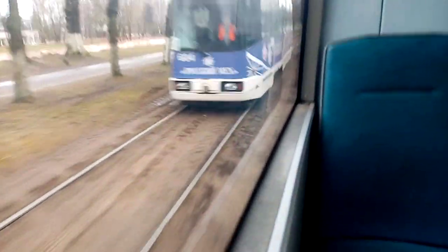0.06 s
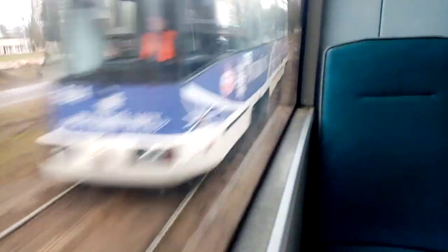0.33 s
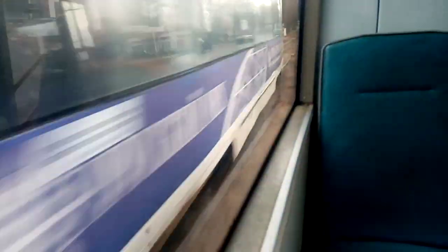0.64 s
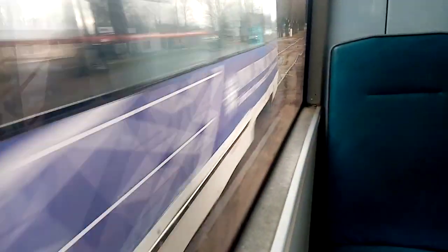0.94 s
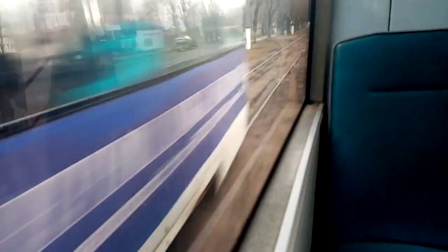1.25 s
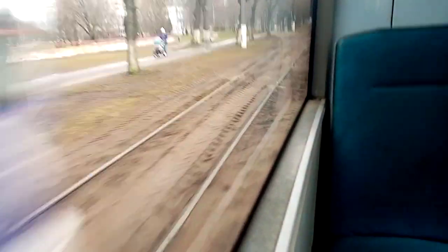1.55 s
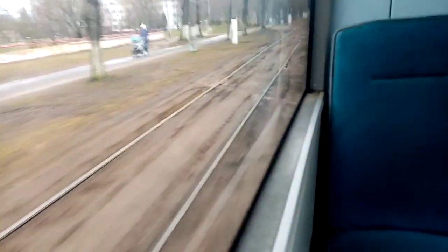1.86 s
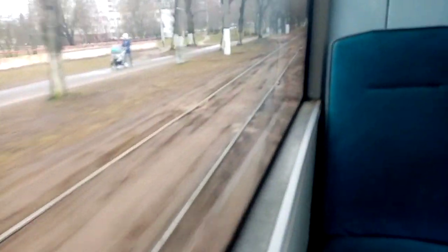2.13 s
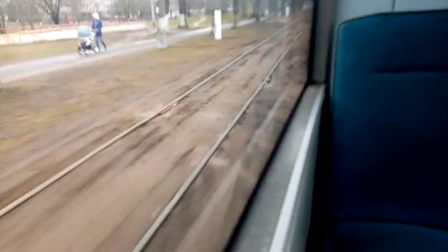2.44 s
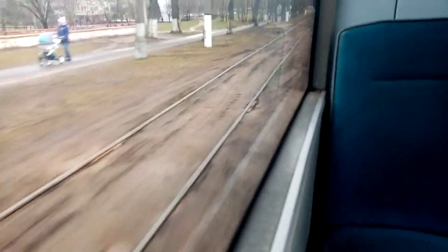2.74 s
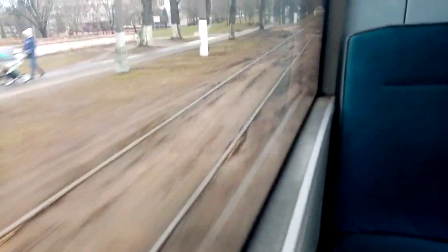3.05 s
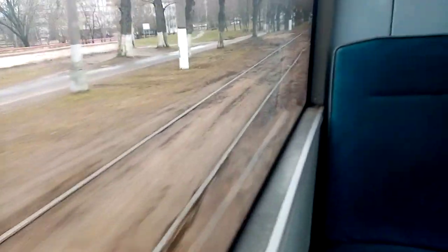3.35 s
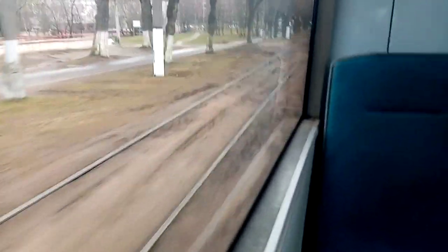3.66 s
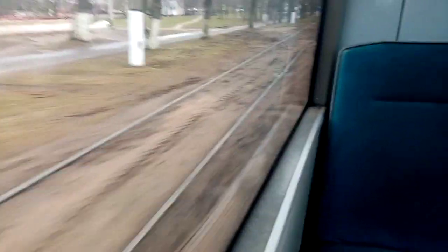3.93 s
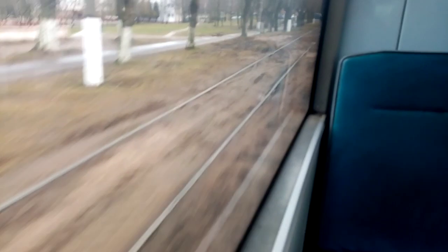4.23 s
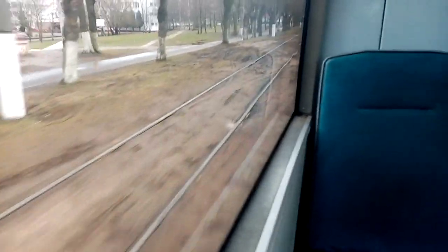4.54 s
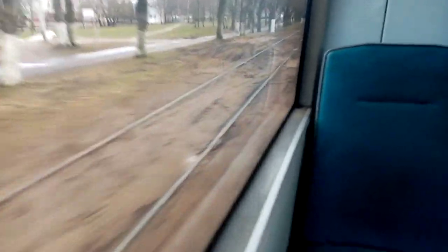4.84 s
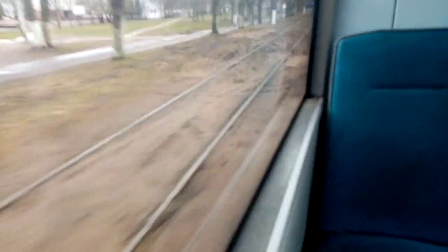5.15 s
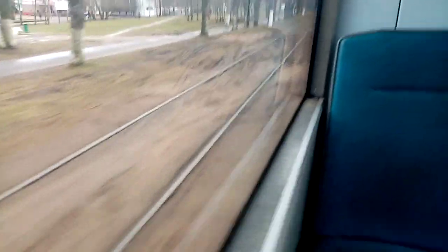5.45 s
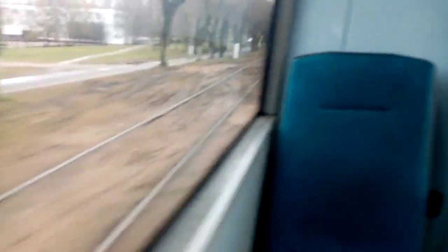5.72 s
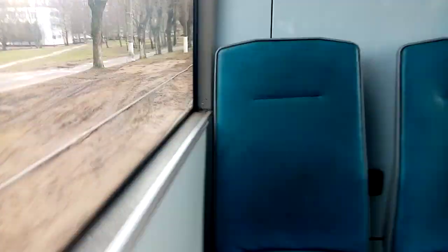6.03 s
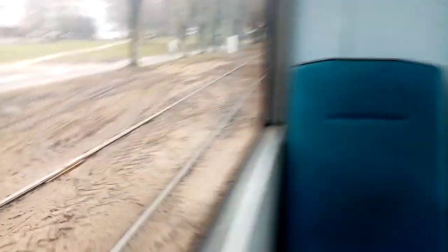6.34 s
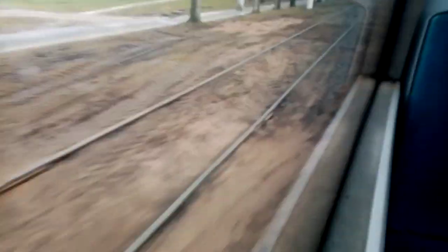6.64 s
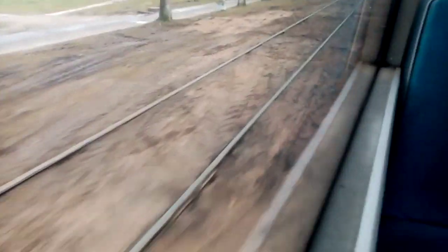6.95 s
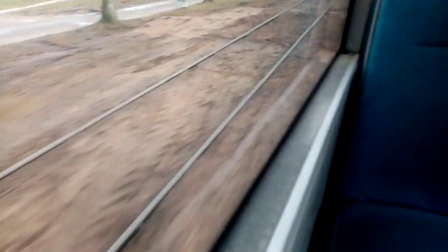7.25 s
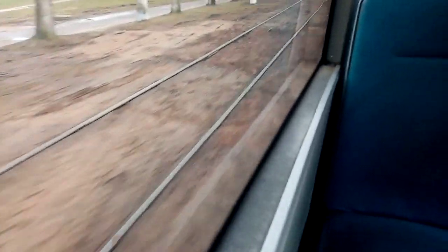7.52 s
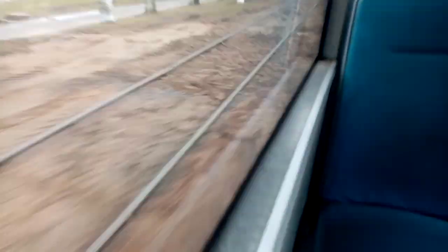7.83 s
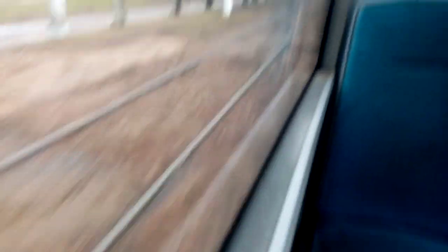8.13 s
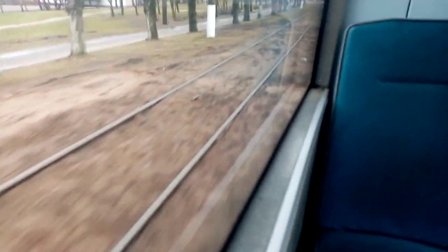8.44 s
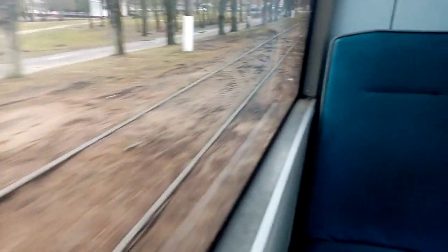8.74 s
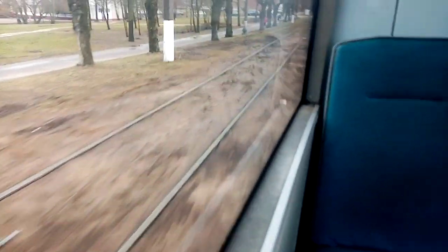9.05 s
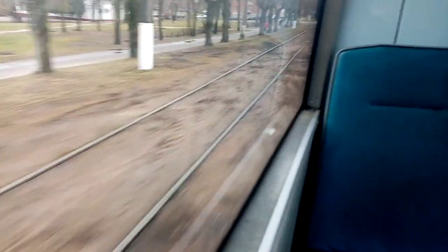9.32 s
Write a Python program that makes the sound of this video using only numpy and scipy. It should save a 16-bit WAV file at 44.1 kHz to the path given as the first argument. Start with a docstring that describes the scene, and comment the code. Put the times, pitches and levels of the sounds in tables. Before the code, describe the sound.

A tram runs at speed for about nine and a half seconds, heard from a window seat and louder on the left. A deep boom and drone continue throughout under the roar of steel wheels, surging slightly and swelling into brief low moans. Loose plates and fittings rattle lightly. The wheels thud and clank unevenly over joints near 0.2 seconds, from 1 to 2, around 3.5 to 4, and with a firmer thud at 4.3. The busiest stretch comes from 6.4 to 7.5, with clustered knocks and one dull wall panel bump at 6.6. Faint hoarse scrapes surface around 2 and 6.7 seconds. Dry trim clicks stand out near 2, 4.3, 5.2 and 7.4. Close by, something like a sleeve rustles softly in repeated strokes, easing after 8 seconds. A barely audible high electronic whine stays on the right.

```python
"""A tram's body booms and drones at speed, heard from a window seat, the left microphone toward the window.
The wheels drive it: they roar on the rails, make it moan on rippled track, knock over joints and scrape.
Steel plates and loose fittings rattle, trim clicks, and the wall panel takes one bump.
Close by, something soft like a sleeve rustles as its fibres catch and slip.
A limiter holds down the peaks, and a faint electronic whine sits on the right."""
import sys
import numpy as np
from scipy import signal
from scipy.fft import rfft, irfft, next_fast_len
from scipy.io import wavfile
from scipy.ndimage import uniform_filter1d, minimum_filter1d

SR = 44100
rng = np.random.default_rng(int(sys.argv[2]) if len(sys.argv) > 2 else 0)


def output_pcm(signal):
    """Save a mono or channel-first signal as 16-bit PCM at the path in sys.argv[1].

    Samples are clipped to [-1, 1] before scaling.
    """
    pcm = np.clip(np.atleast_2d(signal).T, -1, 1) * 32767
    wavfile.write(sys.argv[1], SR, np.round(pcm).astype(np.int16))


N = 418180
TIME = np.arange(N) / SR
MIC_LAG_S = 0.00095   # direct sound reaches the right microphone this much later

# Tone of the floor's boom, the walls' drone and the cabin's upper hum.
# Each row: frequency in Hz, relative level in dB.
BOOM_TONE = [(12, -59), (28, -45), (40, -23.5), (55, -11), (70, 2), (84, 2), (102, -1.5), (122, -11),
             (150, -18.5), (220, -92)]
DRONE_TONE = [(100, -20.5), (126, -10), (146, -2), (163, -1.5), (180, -3.5), (205, -10.5), (260, -31.5),
              (400, -83)]
HUM_TONE = [(140, -36.5), (195, 0), (225, -0.5), (270, -3.5), (298, -7), (320, -3.5), (350, -18.5),
            (430, -18.5), (600, -20), (1200, -82.5)]
# Slow fader rides for the same three. Each row: time in seconds, fader in dB.
BOOM_RIDE = [(0, -22), (2.2, -21), (3.7, -22.5), (4.7, -21.5), (5.5, -23.5), (6.25, -20), (6.5, -26.5),
             (7.3, -22.5), (8.2, -21.5), (9.48, -22.5)]
DRONE_RIDE = [(0, -20), (.5, -23.5), (.7, -23), (2.1, -22.5), (2.25, -28.5), (2.7, -22.5), (3.9, -22),
              (5.2, -21.5), (5.6, -21), (5.94, -27), (6.3, -23), (7.1, -23.5), (8.8, -20.5), (9.02, -28),
              (9.15, -21), (9.48, -24)]
HUM_RIDE = [(0, -25), (.33, -21.5), (.6, -31.5), (1.15, -23.5), (1.55, -30), (1.9, -26.5), (2.8, -27.5),
            (3.3, -25.5), (3.95, -26), (4.4, -27.5), (5.25, -28), (5.5, -23.5), (5.95, -30.5), (6.7, -26),
            (7.6, -25.5), (8.4, -27), (9.1, -27), (9.48, -27.5)]
# Dips in the track push or ease the boom. Each row: peak time in seconds, boost or cut in dB.
TRACK_DIPS = [(.48, 3), (.76, -3), (.9, 7), (1.06, -2), (1.24, 4), (2.07, -6), (2.24, 1), (3.06, -6),
              (3.2, 7.5), (3.45, 6), (3.72, 4.5), (3.86, 3.5), (4.03, 6), (4.722, -10), (5.42, -6),
              (7.37, -11), (7.5, 6), (7.67, -1), (7.77, 6), (7.98, 3.5), (8.4, -13), (8.54, 4.5), (9.25, 6)]


def car_body():
    """Floor and walls resonate; their long waves are alike at both microphones."""
    (boom_db,), (drone_db,), (hum_db,) = in_time(BOOM_RIDE), in_time(DRONE_RIDE), in_time(HUM_RIDE)
    lurch_db = sum(db * swell(s, half_s=0.063) for s, db in TRACK_DIPS)
    boom = sustained(cabin_noise(BOOM_TONE, diffuse=0.0094), window_s=0.16)
    hum = sustained(cabin_noise(HUM_TONE, diffuse=0.023), window_s=0.15)
    drone = sustained(cabin_noise(DRONE_TONE, diffuse=0.034), window_s=0.15)
    return from_db(boom_db + lurch_db) * boom + from_db(drone_db + 0.4) * drone + from_db(hum_db) * hum


# Moans of the body. Each row: peak time in seconds, half length in seconds, pitch in Hz,
# glide in Hz per second, level in dB.
BODY_MOANS = [(0.696, 0.16, 158.1, -21, -22), (0.884, 0.12, 80, 4.5, -21), (1.573, 0.18, 158.3, 0.5, -21.5),
              (2.13, 0.05, 313, -2, -29), (2.399, 0.45, 82, -5, -23), (2.657, 0.14, 168, 0.5, -23),
              (3.17, 0.086, 143.7, -1, -24), (3.59, 0.14, 161, -0.5, -21.5), (3.94, 0.065, 226, 2.5, -17.5),
              (4.687, 0.063, 160, -1, -16.5), (5.485, 0.19, 230, -34.5, -16.5),
              (5.85, 0.23, 72.4, -2.5, -26.5), (6.367, 0.11, 147, -44, -17.5), (6.712, 0.022, 420, 0, -23),
              (6.925, 0.071, 418, -0.5, -25), (7.152, 0.071, 240, 0, -26), (7.34, 0.21, 147, 46, -20),
              (7.675, 0.12, 152.4, 5.5, -18.5), (9.117, 0.13, 232.6, -0.5, -22.5),
              (9.234, 0.21, 84, -0.5, -20)]


def moans():
    """Short rough, wavering tones swell and fade as the wheels cross rippled rail."""
    out, waver_hz = np.zeros((2, N)), 2.85 * drift(9.7)
    for s, half_s, hz, glide, db in BODY_MOANS:
        pitch = hz + glide * np.clip(TIME - s, -half_s, half_s) + waver_hz
        cycles = np.cumsum(pitch) / SR - hz * np.array([[0], [MIC_LAG_S]])
        tone = np.sqrt(2) * np.sin(2 * np.pi * cycles)
        out += from_db(db) * swell(s, half_s) * window_pan(hz) * tone
    return out * from_db(2.3 * drift(17))


# Rough stretches of rail. Each row: start in seconds, release in seconds, gain change in dB.
ROUGH_STRETCHES = [(0.13, 0.29, 2), (0.937, 0.25, 4), (1.16, .4, 2), (1.634, 0.47, 1.5), (2.082, 0.27, 1.5),
                   (2.703, 0.13, 2), (3.15, 0.22, 0.5), (3.467, 0.36, -0.5), (3.872, 0.055, 3),
                   (5.67, 0.057, 4), (6.38, 0.43, 1.5), (6.686, 0.22, 0), (6.95, 0.24, 3.5),
                   (7.398, 0.12, 3), (7.8, 0.14, 2.5), (8.047, 0.076, 1.5), (9.36, 0.11, 5)]


def rough_rail(attack_s=0.029):
    """Boost in dB from rough rail: a quick attack on each stretch, then an even fall."""
    boost_db = np.zeros(N)
    for s, release_s, db in ROUGH_STRETCHES:
        rise, fall = (TIME - s) / attack_s, 1 - (TIME - s - attack_s) / release_s
        boost_db += db * np.clip(np.minimum(rise, fall), 0, 1)
    return boost_db


# Tone of the rolling roar and of the ringing steel. Each row: frequency in Hz, relative level in dB.
ROAR_TONE = [(200, -31), (330, 5), (430, 2), (520, 1), (630, -2.5), (830, -2), (1020, -3.5), (1200, -6.5),
             (1600, -13), (3000, -74)]
STEEL_TONE = [(900, -20.5), (1350, -2), (1650, 3), (1950, 0.5), (2200, -1), (2450, -0.5), (2750, -3.5),
              (3300, -8.5), (4200, -11.5), (6000, -15.5), (9000, -65)]
# Wheels on even rail, ahead of the trims. Each row: time in seconds, roar fader in dB, steel fader in dB.
ROLLING_RIDE = [(0.0, -31, -37), (1.24, -30, -35.5), (1.4, -31.5, -34), (2.9, -29, -35.5),
                (3.62, -28.5, -34), (4.09, -30, -37), (4.62, -28.5, -34), (5.65, -30.5, -35),
                (5.91, -30.5, -32), (6.47, -28.5, -34.5), (9.29, -30.5, -38.5), (9.48, -31.5, -39)]


def wheels(roar_trim_db=-1, steel_trim_db=-1.54):
    """Rolling roar and the ring of the steel, both fluttering with the roughness of the rail."""
    roar_db, steel_db = in_time(ROLLING_RIDE)
    boost_db, flutter = rough_rail(), drift(15.6)
    roar_gain = from_db(roar_db + roar_trim_db + boost_db + 0.87 * flutter)
    steel_gain = from_db(steel_db + steel_trim_db + 0.96 * boost_db + 0.7 * flutter)
    roar = roar_gain * cabin_noise(ROAR_TONE, diffuse=0.66, lag_s=0.001)
    steel = steel_gain * cabin_noise(STEEL_TONE, diffuse=0.9, lag_s=0.001384)
    return roar + steel


# Knocks of wheels and steel. Each row: start in seconds, thud fader in dB, clank fader in dB, clank attack in
# seconds.
JOINT_HITS = [(0.156, -42.5, -20.5, 0.00035), (0.172, -34, -31, 0.0022), (0.238, -27, -26.5, 0.00093),
              (0.96, -35, -24, .005), (1.02, -36, -28, .005), (1.141, -28, -32, .005),
              (1.23, -32, -26.5, 0.0025), (1.638, -44, -24.5, 0.0021), (1.84, -36, -27, 0.0016),
              (1.975, -28, -27.5, 0.0033), (2.109, -20, -46, 0.0022), (2.712, -39, -29, 0.0028),
              (3.409, -42, -31, 0.0022), (3.504, -30, -26.5, 0.0016), (3.612, -40, -25.5, .002),
              (3.893, -28, -25, 0.00069), (4.257, -18.5, -30, 0.0024), (4.671, -40, -27, 0.0014),
              (4.765, -40, -27.5, 0.0013), (4.846, -42, -27, .001), (5.18, -36, -31, 0.003),
              (5.882, -45, -27.5, 0.0009), (6.395, -21.5, -36, .002), (6.485, -27, -29, 0.0032),
              (6.697, -22, -23, .008), (6.968, -25, -20.5, .0008), (6.994, -30, -27, 0.0012),
              (7.028, -25, -26.5, 0.002), (7.068, -27, -42, 0.0018), (7.135, -25.5, -24.5, .005),
              (7.251, -40, -29, .004), (7.436, -31, -26, .002), (7.551, -44, -28.5, 0.0023),
              (8.09, -26, -39, 0.0023), (8.612, -40, -31, .002), (9.379, -33, -32, 0.0022)]
# Tone of the thud. Each row: frequency in Hz, relative level in dB.
THUD_TONE = [(120, -18), (240, -12), (340, 16), (500, -2), (900, -10), (2000, -45)]
# Resonances of the bogie. Each row: centre in Hz, bandwidth in Hz, relative level in dB.
BOGIE_MODES = [(480, 270, -17), (776, 150, 1), (940, 390, 9.5), (1355, 200, 6), (1730, 130, 5),
               (1900, 560, -1), (2570, 1900, -4.5), (3150, 380, -12)]


def knocks():
    """Each knock sends a dull thud through the floor, clanks the bogie and sets the plates chattering."""
    times, thud_db, clank_db, attack_s = np.transpose(JOINT_HITS)
    thud = hit_envelope(times, thud_db, t60=0.14, attack_s=0.0024) * cabin_noise(THUD_TONE, diffuse=0.24)
    clank_gain = hit_envelope(times, clank_db - 4, t60=0.25, attack_s=attack_s)
    clank = clank_gain * cabin_noise(through_floor(BOGIE_MODES), diffuse=1, lag_s=0.00088)
    return thud + clank + chatter(times + attack_s, clank_db - 5)


def chatter(times, dbs, count=4, gap_s=0.016, loss_db=10.5):
    """After a knock the plates strike in an uneven run, weaker each time."""
    gaps = gap_s * (.5 + rng.random((len(times), count)))
    contact_s = times[:, None] + np.cumsum(gaps, axis=1) - gaps[:, :1]
    contact_db = dbs[:, None] - loss_db * np.arange(count)
    return plate_ring(contact_s.ravel(), contact_db.ravel())


# Modes of the car's steel plates. Each row: pitch in Hz, relative level in dB, 60 dB decay in seconds.
PLATE_MODES = [(555, -1.5, 0.15), (747, -6.5, 0.086), (916, 1, 0.14), (989, 1, 0.19), (1090, -4.5, 0.13),
               (1320, -12, 0.074), (1622, 0, 0.13), (1797, -2.5, .16), (1916, -5.5, 0.086),
               (2484, -6.5, .18), (2800, -13, 0.17), (2920, -12, 0.15)]


def plate_ring(times, dbs, spread_db=3):
    """Each contact rings the plates' modes, every one with a random strength of its own."""
    starts, out = np.clip(times * SR, 0, N - 1).astype(int), np.zeros((2, N))
    draws = rng.standard_normal((len(starts), 2, len(PLATE_MODES), 2))
    strengths = np.sign(draws[:, 0]) * from_db(spread_db * (draws[:, 1] - .5))
    for k, (hz, db, t60) in enumerate(PLATE_MODES):
        blows = np.full((2, N), 1e-18)
        blows[:, starts] = from_db(dbs + db) * strengths[:, k].T
        r, w = from_db(-60 / (t60 * SR)), 2 * np.pi * hz / SR
        out += window_pan(hz) * signal.lfilter([0, np.sin(w)], [1, -2 * r * np.cos(w), r * r], blows)
    return out


# Hoarse scrapes of steel on steel. Each row: peak time in seconds, half length in seconds,
# centre in Hz, bandwidth in Hz, level in dB before the floor muffles it.
STEEL_SCRAPES = [(0.754, .06, 7400, 600, -39), (1.662, 0.074, 830, 110, -27.5),
                 (1.68, 0.16, 3110, 150, -33.5), (1.86, 0.058, 3000, 400, -34),
                 (1.26, 0.11, 2380, 900, -34), (2.24, 0.24, 2480, 500, -31.5),
                 (2.755, 0.18, 2800, 400, -36), (3.247, 0.29, 2760, 350, -39), (4.36, .12, 2430, 120, -37),
                 (4.683, .15, 2380, 400, -38.5), (6.61, 0.12, 1700, 1100, -28),
                 (6.707, 0.031, 2100, 700, -32), (6.82, 0.066, 2200, 1200, -32.5),
                 (7.186, 0.065, 2500, 110, -33.5), (7.4, .06, 2470, 80, -42), (8.1, .05, 1000, 250, -30),
                 (8.27, .05, 2600, 300, -38), (8.45, 0.1, 2580, 300, -35), (8.66, .07, 4500, 120, -46),
                 (8.972, .06, 4560, 120, -47), (9.28, .06, 4570, 150, -46)]


def scrapes(floor_cutoff_hz=7500):
    """Friction excites one resonance of the steel, too unevenly to become a clean squeal."""
    out, white = np.zeros((2, N)), rng.standard_normal((2, N))
    for s, half_s, hz, width, db in STEEL_SCRAPES:
        r = np.exp(-np.pi * width / SR)
        ringing = signal.lfilter([1, 0, -1], [1, -2 * r * np.cos(2 * np.pi * hz / SR), r * r], white)
        out += from_db(db) * swell(s, half_s) * window_pan(hz) * rms_one(ringing)
    return butter(out, 4, floor_cutoff_hz)


# Modes of the wall panel by the seat. Each row: pitch in Hz, relative level in dB, 60 dB decay in seconds.
PANEL_MODES = [(315, -1.5, 0.08), (407, -3, 0.054), (603, -7, .035), (1090, -0.5, 0.012), (1630, -10, .012)]


def panel_bump(start_s=6.6487, gain_db=-4.5):
    """A single soft blow sets the well-damped panel ringing."""
    age = np.maximum(TIME - start_s - np.array([[0], [MIC_LAG_S]]), 0)
    ring = sum(from_db(np.maximum(db - 60 * age / t60, -200)) * np.sin(2 * np.pi * hz * age)
               for hz, db, t60 in PANEL_MODES)
    return -from_db(gain_db) * pan(16) * butter(ring, 2, 3500)


# Tone of the cloth's rustle and of its crisp top. Each row: frequency in Hz, relative level in dB.
RUSTLE_TONE = [(1500, -12.5), (3000, -3.5), (4200, -3), (5400, -3), (6200, 1), (6750, 3.5), (7300, -0.5),
               (7900, -9), (8400, -28.5), (10500, -39)]
CRISP_TONE = [(6000, -13), (8500, 2.5), (11000, -2), (13000, -4.5), (14000, -8), (14700, 8), (15400, 0),
              (17000, -28)]
# Light steady rubbing, ahead of the trims. Each row: time in seconds, rustle fader in dB, top fader in dB.
CLOTH_RIDE = [(0, -44.5, -80), (1.0, -40.5, -77), (1.93, -39, -72), (2.2, -35.5, -66), (2.55, -39.5, -67),
              (2.66, -45.5, -76), (2.76, -41, -70), (3.0, -44, -74), (3.25, -41, -75), (3.47, -45, -77),
              (3.6, -41, -60), (4.02, -41.5, -62), (4.48, -41, -66), (4.7, -38.5, -66), (5.06, -39, -67),
              (5.4, -36, -65), (5.55, -39, -67), (6.1, -38.5, -64), (6.68, -38.5, -68), (7.6, -41.5, -65),
              (8.15, -45, -78), (8.6, -44, -78), (9.0, -44, -74), (9.48, -43, -71)]
# Strokes of the cloth. Each row: peak time in seconds, half length in seconds, level in dB,
# crisp top in dB relative to that, left over right in dB.
CLOTH_STROKES = [(0.32, 0.44, -38, -24.5, 1), (0.742, 0.076, -39, -30, -1), (1.224, 0.06, -35.5, -24, -1),
                 (1.48, 0.13, -38.5, -27, -1), (1.674, 0.071, -35.5, -41, -1),
                 (1.788, 0.055, -33.5, -21, 1), (1.99, 0.062, -32, -22, 4), (2.21, 0.097, -38, -28, 2),
                 (2.323, 0.065, -34, -25, 1), (2.525, 0.061, -37.5, -19, .5), (3.58, 0.15, -38, -14, -1),
                 (3.77, 0.25, -35.5, -16, -.5), (4.119, 0.058, -36.5, -16, -2), (4.34, 0.16, -36.5, -17, 0),
                 (4.565, 0.076, -38, -23, 0), (4.792, .045, -36.5, -21, 0), (4.905, 0.15, -35.5, -20, 1),
                 (5.22, 0.15, -35, -41, 2), (5.226, .035, -32, -36, 3), (5.755, 0.36, -40, -15, -7),
                 (5.954, 0.24, -32.5, -15, -3), (6.33, 0.097, -36, -15.5, -2), (6.55, 0.2, -36.5, -15.5, 0),
                 (6.622, 0.05, -36, -22, 2), (6.82, 0.055, -42, -26, 2), (6.998, 0.18, -38, -17, -2),
                 (7.126, 0.028, -38, -15, -3), (7.417, 0.069, -33, -17, -7), (7.574, 0.057, -40, -16, -11),
                 (7.655, 0.054, -39, -13, -6), (7.866, 0.045, -45, -11, -10), (8.332, 0.11, -48, -16, -1),
                 (9.414, .08, -43, -26, -3)]


def sleeve(rustle_trim_db=-0.5, crisp_trim_db=5):
    """Cloth rubs close by, strokes over light contact; its crisp top sits mostly on the right."""
    rustle_db, crisp_db = in_time(CLOTH_RIDE)
    rustle_power = (from_db(rustle_db + rustle_trim_db) * pan(-.6)) ** 2
    crisp_power = from_db(crisp_db + crisp_trim_db) ** 2
    for s, half_s, db, top_db, side_db in CLOTH_STROKES:
        stroke = from_db(db) * swell(s, half_s, lean=0.15)
        rustle_power += (stroke * pan(side_db)) ** 2
        crisp_power += (stroke * from_db(top_db)) ** 2
    grip = drift(25)
    rustle = np.sqrt(rustle_power) * from_db(1.1 * grip) * fibres(RUSTLE_TONE)
    crisp = np.sqrt(crisp_power) * from_db(1.2 * grip) * pan(-13) * fibres(CRISP_TONE)
    return rustle + crisp


def fibres(tone):
    """Fibres catch and let go in a dense stream, while single ones snag and snap free."""
    slips = crackle(tone, per_s=14000, spread_db=1.5)
    snags = crackle(tone, per_s=140, spread_db=2)
    return slips + from_db(-13) * snags


# Clicks near the seat. Each row: start in seconds, level in dB, crisp top in dB, left over right in dB.
TRIM_CLICKS = [(0.162, -32, -70, 7), (1.209, -26, -60, 10), (1.219, -24, -60, 2), (1.861, -27, -70, -1),
               (1.962, -17, -45, 0), (2.637, -40, -47, -10), (3.599, -35, -37, -5), (3.619, -27, -50, -5),
               (3.792, -23, -50, -2), (4.257, -18, -42, 3), (4.298, -26, -50, -2), (4.382, -21.5, -50, 0),
               (4.385, -28, -55, 0), (5.18, -30, -60, 0), (5.211, -21, -55, 1), (6.597, -26, -55, 6),
               (6.625, -22, -50, 2), (7.121, -30, -39, -8), (7.414, -22, -45, -11), (7.421, -23, -45, -11),
               (7.566, -21.5, -50, -3), (7.843, -34, -55, -9), (8.714, -31, -58, -8), (8.725, -33, -60, -6),
               (9.181, -37, -48, -3)]
# Tone of a click. Each row: frequency in Hz, relative level in dB.
CLICK_TONE = [(1500, -15), (2600, 6), (3500, -2), (5200, -2), (6700, 5), (7500, -3), (8600, -29),
              (14000, -44), (17000, -44)]


def trim_clicks(t60=0.0096):
    """Loose trim clicks, dry and bright, with a faint cabin tail and a crisp top mostly on the right."""
    times, db, crisp_db, side_db = np.transpose(TRIM_CLICKS)
    direct = np.array([hit_envelope(times, db + 20 * np.log10(gain), t60, attack_s=0.00031)
                       for gain in pan(side_db)])
    tail = hit_envelope(times, db - 15.5, t60=0.19, attack_s=0.0027)
    crisp = hit_envelope(times, crisp_db, t60, attack_s=0.0002) * pan(-15)
    return np.hypot(direct, tail) * crackle(CLICK_TONE) + crisp * crackle(CRISP_TONE)


def rattle(count=200, softest_db=-44, spread_db=7):
    """Loose plates keep touching at random, harder on rough rail."""
    when, strength = rng.random((count, 2)).T
    times = when * N / SR
    return plate_ring(times, softest_db + spread_db * strength + np.interp(times, TIME, rough_rail()))


def fittings(count=50, softest_db=-37, spread_db=7):
    """Loose metal parts tick faintly at random moments."""
    when, strength = rng.random((count, 2)).T
    ticks = hit_envelope(when * N / SR, softest_db + spread_db * strength, t60=0.098, attack_s=0.00041)
    return ticks * cabin_noise(through_floor(BOGIE_MODES), diffuse=0.24, lag_s=0.00085)


# Stereo lean of the running noise. Each row: frequency in Hz, left over right in dB.
WINDOW_BALANCE = [(60, 6), (120, 6.5), (220, 8), (400, 10.5), (1000, 10.5), (1600, 6), (2500, 6),
                  (4400, 10.5)]


def window_pan(hz):
    """The tram is louder on the window side, by an amount that depends on frequency."""
    return pan(at_hz(WINDOW_BALANCE, hz))


def cabin_noise(tone, diffuse, lag_s=MIC_LAG_S):
    """Noise in the cabin: a direct part reaches the left first, a diffuse share differs at each side."""
    size = next_fast_len(N)
    hz = np.arange(size // 2 + 1) * SR / size
    white = rfft(rng.standard_normal((3, size)))
    direct = white[2] * np.exp(-2j * np.pi * hz * np.array([[0], [lag_s]]))
    field = np.sqrt(1 - diffuse) * direct + np.sqrt(diffuse) * white[:2]
    colour_db = at_hz(tone, hz) + standing_waves(hz, depth_db=1.3, spacing_hz=35)
    x = irfft(field * from_db(colour_db) * window_pan(hz), size)[:, :N]
    return x / np.std(x.mean(axis=0))


def crackle(tone, per_s=SR, spread_db=0):
    """Tiny random clicks, different at each microphone; at one per sample they merge into hiss."""
    size = next_fast_len(N)
    clicks = (rng.random((2, size)) < per_s / SR) * rng.choice([-1, 1], (2, size))
    clicks = clicks * from_db(spread_db * np.minimum(rng.exponential(1, (2, size)), 6))
    hz = np.arange(size // 2 + 1) * SR / size
    colour_db = at_hz(tone, hz) + standing_waves(hz, depth_db=1.2, spacing_hz=110)
    x = irfft(rfft(clicks) * from_db(colour_db), size)[:, :N]
    return x / np.std(x.mean(axis=0))


def standing_waves(hz, depth_db, spacing_hz):
    """The cabin's standing waves leave small steady peaks and dips in a tone, in dB."""
    knots = np.arange(0, SR / 2, spacing_hz)
    heights = rng.standard_normal(SR // 8)[:len(knots)]
    return depth_db * np.interp(hz, knots, heights) * hz / (hz + 300)


def through_floor(modes, cutoff_hz=4500):
    """The tone, as (Hz, dB) rows, of resonances whose top the floor muffles."""
    hz = np.geomspace(100, SR / 2, 600)
    power = sum(from_db(db) ** 2 / (1 + ((hz - f * f / hz) / width) ** 2) for f, width, db in modes)
    return np.transpose([hz, 10 * np.log10(power / (1 + (hz / cutoff_hz) ** 6))])


def sustained(x, window_s):
    """A steadily driven vibration: fast beats stay, slow swells are evened out."""
    power = uniform_filter1d(x.mean(axis=0) ** 2, int(window_s * SR))
    return x / np.sqrt(power + 1e-9)


def hit_envelope(times, dbs, t60, attack_s):
    """Envelope of blows whose energy builds quickly and dies away in the cabin."""
    energy = np.zeros(N)
    for s, db, attack in np.broadcast(times, dbs, attack_s):
        start = int(np.clip(s * SR, 0, N - 1))
        age = TIME[:min(SR, N - start)]
        blow = from_db(db - 60 * age / t60) * (1 - np.exp(-age / attack))
        energy[start:start + len(age)] += blow ** 2
    return np.sqrt(energy)


def swell(s, half_s, lean=0):
    """A smooth rise and fall around time s; lean shortens the rise and lengthens the fall."""
    out = np.zeros(N)
    first, last = np.searchsorted(TIME, [s - 2 * half_s, s + 2 * half_s])
    age = TIME[first:last] - s
    span = half_s * (1 + lean * np.sign(age))
    out[first:last] = np.cos(np.pi / 2 * np.clip(age / span, -1, 1)) ** 2
    return out


def drift(rate_hz):
    """Smooth random modulation with a spread of 1."""
    hop, settle = 40, 2000
    r = np.exp(-2 * np.pi * rate_hz * hop / SR)
    slow = signal.lfilter([1], [1, -2 * r, r * r], rng.standard_normal(N // hop + settle + 2))[settle:]
    return np.interp(np.arange(N) / hop, np.arange(len(slow)), rms_one(slow))


def pan(db):
    """Constant-power left and right gains, the left louder by db."""
    gains = from_db(np.array([np.atleast_1d(db), -np.atleast_1d(db)]) / 2)
    return gains / np.sqrt(np.mean(gains ** 2, axis=0))


def in_time(ride):
    """Each fader of a ride, at every sample."""
    s, *faders = np.transpose(ride)
    return [np.interp(TIME, s, fader) for fader in faders]


def at_hz(points, hz):
    """Read a curve on a log-frequency axis."""
    f, value = np.transpose(points)
    return np.interp(np.log(np.maximum(hz, 1)), np.log(f), value)


def butter(x, order, hz, kind="low"):
    """Low-pass or high-pass filter."""
    return signal.sosfilt(signal.butter(order, hz, kind, fs=SR, output="sos"), x)


def from_db(db):
    """Decibels to gain."""
    return 10 ** (np.asarray(db) / 20)


def rms_one(x):
    """Scale to unit power."""
    return x / np.sqrt(np.mean(x ** 2) + 1e-20)


def scene():
    """Everything heard at the seat."""
    running = car_body() + moans() + wheels() + scrapes()
    blows = knocks() + panel_bump() + trim_clicks() + rattle() + fittings()
    return running + blows + sleeve()


def limiter(x, ceiling_db=-2.5, ahead_s=0.011, hold_s=0.023, release_db_per_s=249):
    """The gain drops just ahead of a peak, holds and recovers, so a hard bump ducks everything else."""
    over_db = np.maximum(20 * np.log10(np.abs(x).max(axis=0) + 1e-9) - ceiling_db, 0)
    ahead, hold = int(ahead_s * SR), int(hold_s * SR)
    held_db = -minimum_filter1d(-over_db, ahead + hold, origin=(hold - ahead) // 2)
    recovery = release_db_per_s * TIME
    cut_db = np.maximum.accumulate(held_db + recovery) - recovery
    return x * from_db(-uniform_filter1d(cut_db, ahead))


# Fader ride of the whine. Each row: time in seconds, level in dB.
WHINE_RIDE = [(0, -71), (.8, -75), (2.8, -70), (8.2, -79), (8.8, -66), (9.48, -74)]


def whine(hz=9700):
    """A faint electronic tone in the right channel only."""
    (db,) = in_time(WHINE_RIDE)
    return from_db(db) * np.sqrt(2) * np.sin(2 * np.pi * hz * TIME) * np.array([[0], [1]])


def record(dry, low_cut_hz=35, high_cut_hz=15650):
    """Peaks are limited, the deepest bass is cut, the whine joins and the top is cut steeply."""
    heard = butter(limiter(dry), 3, low_cut_hz, "high") + whine()
    return signal.sosfilt(signal.ellip(12, .1, 90, high_cut_hz, fs=SR, output="sos"), heard)


dry = scene()
out = record(dry)
output_pcm(out)
```